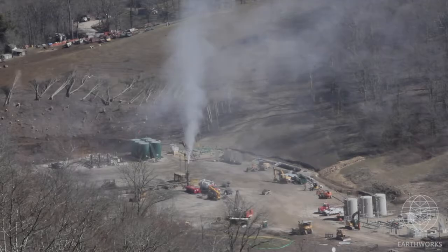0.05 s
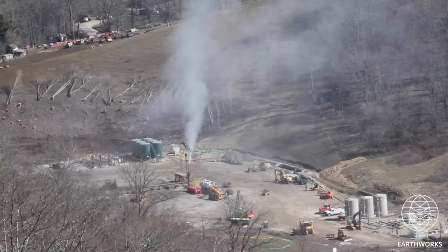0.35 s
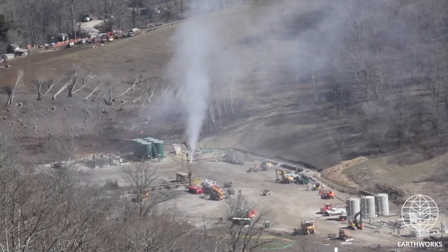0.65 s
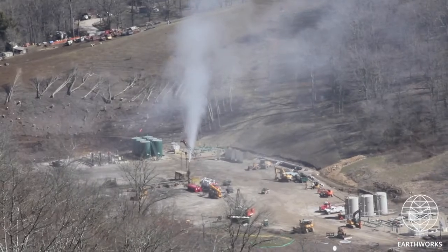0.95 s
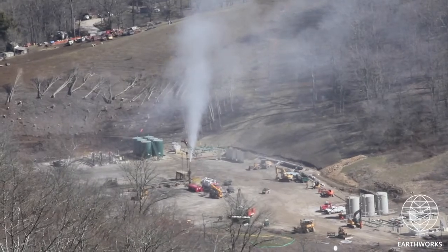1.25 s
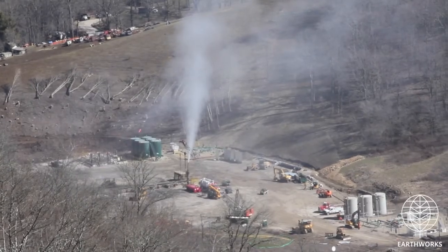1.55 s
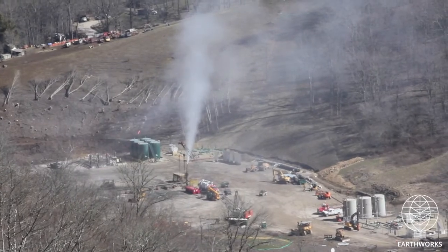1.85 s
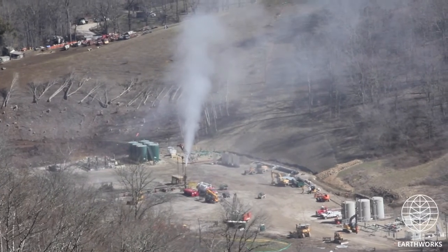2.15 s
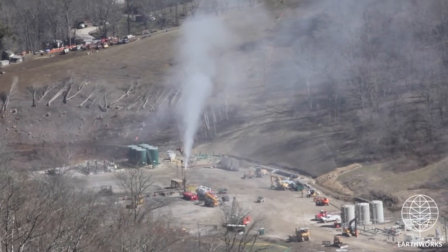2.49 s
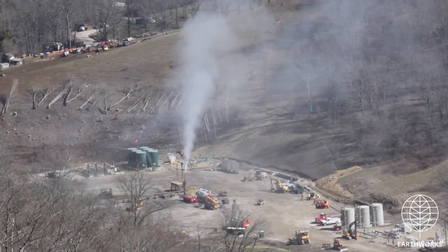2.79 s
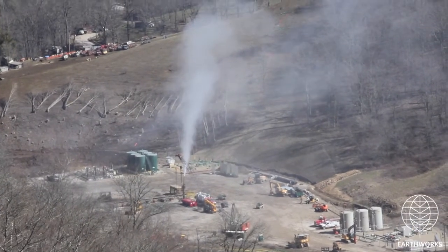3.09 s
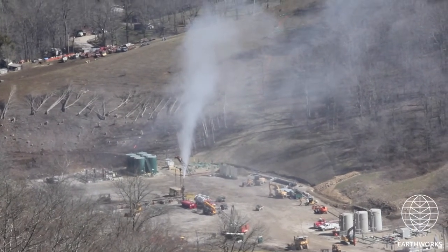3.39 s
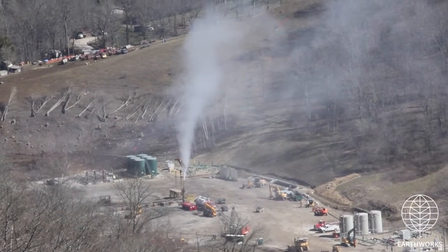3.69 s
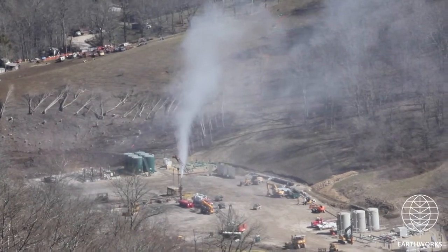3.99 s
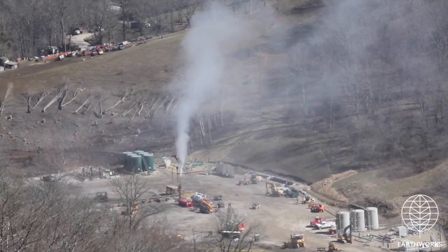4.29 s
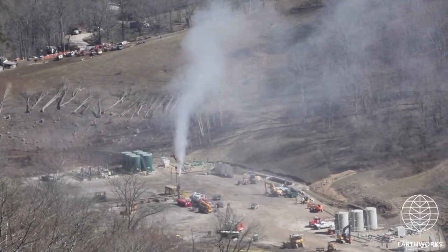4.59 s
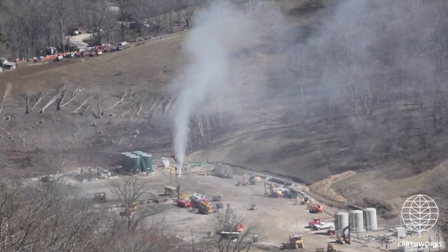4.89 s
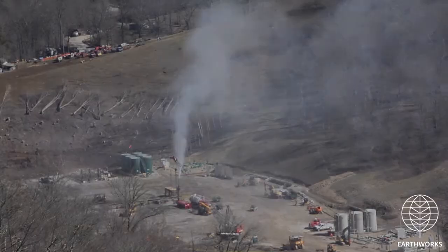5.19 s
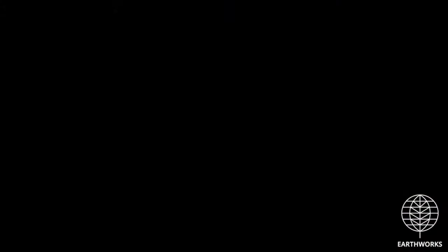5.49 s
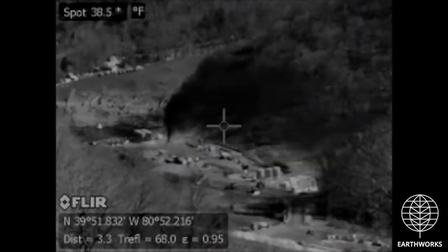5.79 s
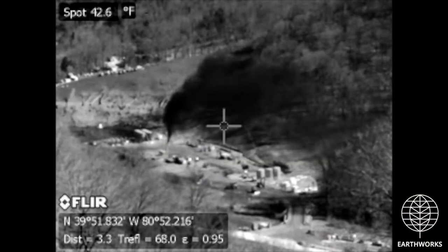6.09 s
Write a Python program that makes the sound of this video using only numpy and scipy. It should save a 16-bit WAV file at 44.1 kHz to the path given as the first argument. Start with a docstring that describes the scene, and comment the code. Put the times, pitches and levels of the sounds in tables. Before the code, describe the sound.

A blown-out gas well jets with a steady, dull roar, heard across a valley from a far hillside. Distance removes the treble, and moving air makes the roar swell and shift slightly. Close to the microphone are a thin hiss, a very faint camera motor whine and a few tiny ticks, with one small sharp click about midway. Everything fades smoothly to silence at the end.

```python
"""A steady, dull roar across a valley: a blown-out gas well, heard from a far hillside.
Distance takes the turbulent jet's treble; moving air swells its low, middle and upper bands in turn.
Close by: a light breeze on the microphone, thin hiss, the faint whine and flutter of the camera's
motors, one click of its case and a few tiny ticks. Then everything fades out."""
import sys
import numpy as np
from scipy import signal
from scipy.fft import rfft, irfft
from scipy.io import wavfile

SR = 44100
rng = np.random.default_rng(int(sys.argv[2]) if len(sys.argv) > 2 else 0)


def file_out(sig):
    """Save sig as 16-bit WAV at sys.argv[1]."""
    # one column per channel
    cols = np.atleast_2d(sig).T
    # limit, then scale
    lim = np.clip(cols, -1, 1)
    pcm = np.round(lim * 32767).astype(np.int16)
    wavfile.write(sys.argv[1], SR, pcm)


N = 275625
TIME = np.arange(N) / SR
ALL_HZ = np.fft.rfftfreq(N, 1 / SR)
BIN_HZ = np.fft.rfftfreq(1024, 1 / SR)
BAND_LIMIT_HZ = 15780
MOTOR_HZ = 24.49  # turns/s


def amp(db):
    """Decibels to gain."""
    return 10 ** (np.asarray(db) / 20)


def unit(x):
    """Scale to unit rms."""
    return x / np.sqrt(np.mean(x ** 2) + 1e-20)


def curve(rows, at_s):
    """Piecewise-linear control from (t/s, value) rows."""
    return np.interp(at_s, *np.transpose(rows))


def colour(points):
    """Spectral gains from (f/Hz, level/dB) rows, linear in dB over log frequency."""
    hz, db = np.transpose(points)
    return amp(np.interp(np.log(ALL_HZ + 1), np.log(hz), db))


def shaped(x, gains):
    """Filter by one gain per frequency; unit rms."""
    return unit(irfft(rfft(x) * gains, N))


def noise(gains):
    """Coloured Gaussian noise; unit rms."""
    return shaped(rng.standard_normal(N), gains)


def bell(offset, half_width):
    """Gaussian bump: height 1, down to 1/e at half_width."""
    return np.exp(-(offset / half_width) ** 2)


def wander(rate_hz):
    """Random drift up to about rate_hz; unit rms."""
    return noise(bell(ALL_HZ, rate_hz))


def tone(hz):
    """Sine following a frequency track."""
    return np.sin(2 * np.pi * np.cumsum(hz) / SR)


def crackle(rate_per_s=16, level_db=-82.5, highpass_hz=9000):
    """Very faint random ticks in the top treble."""
    impulses = (rng.random(N) < rate_per_s / SR) * rng.standard_normal(N)
    return amp(level_db) * shaped(impulses, 1 - np.exp(-(ALL_HZ / highpass_hz) ** 6))


def hiss(level_db=-55, start_offset_db=-5.5, settle_s=0.7):
    """Microphone self-noise; starts low and settles."""
    # hiss spectrum: f/Hz, relative level/dB
    spectrum = [(1000, 6), (4300, 3), (5200, 0), (7600, -1.5), (9200, -4), (10200, -5), (11000, -4.5),
                (12200, -6), (15700, -9)]
    return amp(level_db + start_offset_db * np.exp(-TIME / settle_s)) * noise(colour(spectrum))


def wind(breeze_db=-65, gust_db=-54.5, gust_s=4.25, half_width_s=0.25, corner_hz=55):
    """A light breeze rumbles on the microphone, with one soft gust."""
    strength = amp(breeze_db) + amp(gust_db) * bell(TIME - gust_s, half_width_s)
    return strength * noise(ALL_HZ / (1 + (ALL_HZ / corner_hz) ** 4))


def bearing(level_db=-64.5, centre_hz=8320, warble_hz=135, jitter_hz=105, jitter_rate_hz=650):
    """The motor's high whine, with a fast warble and a buzz from its cogs."""
    cogs, buzz_depth = 12, 0.4
    cog_phase = 2 * np.pi * cogs * MOTOR_HZ * TIME
    hz = centre_hz + warble_hz * np.sin(cog_phase / 2) + jitter_hz * wander(jitter_rate_hz)
    buzz = 1 + buzz_depth * np.cos(cog_phase)
    return amp(level_db) * unit(buzz * tone(hz))


def spurts(centre_hz=3990, waver_hz=22, waver_rate_hz=60):
    """The motor's whistle locks briefly into a nearly clean tone."""
    # tone bursts: t/s, half width/s, level/dB
    bursts = [(.18, .015, -60), (.28, .03, -61), (.857, .012, -53), (1.097, .022, -55), (1.415, .012, -54),
              (1.505, .016, -56), (2.132, .012, -54), (4.775, 0.028, -58), (5.195, 0.019, -55.5),
              (5.24, .02, -56), (5.33, .025, -57)]
    strength = sum(amp(db) * bell(TIME - s, half_width_s) for s, half_width_s, db in bursts)
    return strength * unit(tone(centre_hz + waver_hz * wander(waver_rate_hz)))


def motor(scrape_half_width_s=0.0013, flare_db=1.2, flare_hz=18):
    """A camera motor scrapes twice a turn; the case rings in narrow bands, the lowest a whistle."""
    # scrapes: position/turn, relative level/dB
    scrapes = [(0.01, -7.5), (0.54, -1)]
    # case resonances: f/Hz, width/Hz, level/dB, scrape modulation depth
    resonances = [(4003, 110, -61.5, 2.1), (4280, 270, -67.5, 1.6), (5290, 830, -75.5, 5),
                  (6140, 220, -71, 8.2), (7040, 240, -70.5, 1.5), (8700, 400, -72, 0.5)]
    # whistle swell: t/s, gain/dB
    whistle_gain = [(0, -7), (.7, -5.5), (1.3, -0.5), (1.7, 0.5), (2.15, -1.5), (3.5, 0.5), (4.2, -4.5),
                    (4.7, 1.5), (5, 0), (5.45, 0)]
    scraping = np.zeros(N)
    for position, db in scrapes:
        offset_turns = (TIME * MOTOR_HZ - position + 0.5) % 1 - 0.5
        scraping += amp(db) * bell(offset_turns / MOTOR_HZ, scrape_half_width_s)
    bands = []
    for hz, width_hz, db, depth in resonances:
        friction = rng.standard_normal(N) * (1 + depth * scraping)
        response = 1 / (1 + 1j * (ALL_HZ - hz) / width_hz * np.sqrt(2)) ** 2
        bands.append(amp(db) * shaped(friction, response))
    whistle, *fizz = bands
    whistle_db = curve(whistle_gain, TIME) + flare_db * wander(flare_hz)
    return whistle * amp(whistle_db) + spurts() + sum(fizz)


def lens(focus_mid_s=2.3, focus_length_s=0.9, idle_db=-7, drift_hz=2.5, drift_rate_hz=12):
    """The lens drive sings in thin tones, louder during one focus run."""
    # drive tones: f/Hz, rms level while focusing/dB
    partials = [(2832, -60), (3176, -60.5), (3960, -68), (4027, -68), (4985, -87), (6180, -69),
                (7031, -82.5), (7811, -77.5), (9184, -78.5)]
    whine = sum(amp(db) * tone(hz + drift_hz * wander(drift_rate_hz)) for hz, db in partials)
    focusing = np.exp(-(2 * (TIME - focus_mid_s) / focus_length_s) ** 4)
    return np.sqrt(2) * whine * amp(idle_db * (1 - focusing))


def ticks(crack_s=0.00055, tail_s=0.0015, tail_db=-14):
    """Tiny ticks: each a bright crack with a very short tail."""
    # ticks: t/s, peak level/dB, high-pass f/Hz
    events = [(0.3590, -47, 9000), (1.1604, -37, 10000), (1.8080, -37, 10000), (1.8392, -36, 9500),
              (2.1402, -40, 6000), (2.3343, -38, 6000), (3.4272, -44, 8000), (3.8009, -47, 10000),
              (4.0278, -45, 10000), (4.0777, -45, 10000), (4.9566, -45, 9000), (5.0140, -41, 7090),
              (5.3568, -34.5, 10000), (5.4507, -38, 10000), (5.7110, -38, 10000)]
    out = np.zeros(N)
    t = np.arange(1024) / SR
    envelope = t / crack_s * np.exp(1 - 2 * t / crack_s) + amp(tail_db) * np.exp(-t / tail_s)
    for s, db, highpass_hz in events:
        band = (1 - np.exp(-(BIN_HZ / highpass_hz) ** 6)) * (BIN_HZ < BAND_LIMIT_HZ)
        burst = envelope * rng.standard_normal(len(t))
        tick = irfft(rfft(burst) * band)
        out[round(s * SR):][:len(t)] += amp(db) * tick / abs(tick).max()
    return out


def click(onset_s=2.6991, rise_s=0.00022, crack_db=-24, crack_s=0.0012, highpass_hz=3000):
    """One fuller click: a short crack rings the camera's case."""
    # case modes: f/Hz, level/dB, decay/s
    modes = [(3330, -26, 0.0019), (3760, -25.5, .0014), (4700, -36, 0.0015), (6800, -28, 0.00089),
             (8600, -24, .0007)]
    t = np.maximum(TIME - onset_s, 0)
    ring = sum(amp(db) * np.exp(-t / decay_s) * np.sin(2 * np.pi * hz * t) for hz, db, decay_s in modes)
    crack = amp(crack_db) * np.exp(-t / crack_s) * noise(ALL_HZ > highpass_hz)
    return (1 - np.exp(-t / rise_s)) * (ring + crack)


def air_swells(frame_s):
    """Moving air swells five bands of the jet separately; dB per frame and bin."""
    # centres of deep bass, rumble, body, roar, rasp: f/Hz
    centres_hz = [105, 175, 330, 700, 1600]
    # slow swell of each band: t/s, gain/dB
    deep = [(0, -3.5), (2.5, -0.3), (3.3, -2), (3.9, 2), (5.4, 0)]
    rumble = [(0, 4), (0.5, 5.5), (2.2, 0.8), (3.4, 1.5), (3.7, -2.2), (4.2, -2.5), (4.6, 0), (5.0, 1),
              (5.4, 0)]
    body = [(0, -1.6), (1, -1.2), (1.8, -1.3), (3.8, -0.6), (4.2, 0.39), (5.1, 0.6), (5.4, 0.14)]
    roar = [(0, -4), (.7, -2.5), (1.15, 0), (1.4, -1), (2.2, -2.5), (2.7, -1.5), (3.4, -3), (4.4, -3.5),
            (5.25, 0.1), (5.5, -0.5)]
    rasp = [(0, -0.14), (0.4, 1.6), (.9, 1.3), (1.25, -0.67), (1.8, 1.2), (2.6, 0.22), (3.8, -0.61),
            (4.7, 0.17), (5.35, -1), (5.65, 1)]
    # brief surges and dips: t/s, half width/s, roar gain/dB, rasp gain/dB
    surges = [(.085, 0.032, 3.5, 1), (.32, 0.05, 0.5, 1), (.465, 0.024, 5.5, -0.5), (.675, 0.011, 3.5, 4),
              (.83, 0.025, 6, 1.5), (1.075, 0.024, 3, 1.5), (2.42, 0.17, 2, -1.5), (2.79, .04, 4, -0.5),
              (3.19, 0.043, -1.5, 1), (3.78, 0.055, 3, -1.5), (5.65, 0.014, -1, 5)]
    band_db = np.transpose([curve(band, frame_s) for band in (deep, rumble, body, roar, rasp)])
    for s, half_width_s, roar_db, rasp_db in surges:
        band_db[:, -2:] += np.outer(bell(frame_s - s, half_width_s), [roar_db, rasp_db])
    crossfades = [np.interp(np.log(BIN_HZ + 1), np.log(centres_hz), row) for row in np.eye(5)]
    return band_db @ np.array(crossfades)


def path_humps(frame_s, half_width_hz=95):
    """Three hollow humps in the roar drift with the sound path; dB per frame and bin."""
    # hump tracks: t/s, f/Hz, height/dB
    core = [(0, 666, 6.5), (.6, 660, 7), (1.2, 614, 3.5), (1.8, 623, 2), (2.4, 740, 2.5), (3.1, 690, 2),
            (4.1, 691, 3), (4.7, 700, 3), (5.25, 690, 3.5)]
    middle = [(.3, 1070, 0), (1.2, 1110, -0.5), (2.3, 1165, 4.5), (3, 1066, -1.5), (4.3, 1130, 2),
              (5.399, 1060, 1.5)]
    rasp = [(.3, 1535, 5), (1.1, 1800, 3), (1.7, 1533, 5), (2.2, 1670, 4), (3.3, 1574, -2.5),
            (4.1, 1500, 0), (4.9, 1650, -1.5), (5.6, 1633, 5.5)]
    gain_db = 0
    for track in (core, middle, rasp):
        s, hz, db = np.transpose(track)
        centre_hz = np.interp(frame_s, s, hz)[:, None]
        height_db = np.interp(frame_s, s, db)[:, None]
        gain_db += height_db * bell(BIN_HZ - centre_hz, half_width_hz)
    return gain_db


def path_patches(frame_s, rms_db=1.01, blur_s=0.066, blur_hz=150):
    """Paths through moving air add and cancel in random patches; dB per frame and bin."""
    offset_s = frame_s[:, None] - frame_s[-1] / 2
    offset_hz = BIN_HZ - BIN_HZ[-1] / 2
    blur = bell(offset_s, blur_s) * bell(offset_hz, blur_hz)
    return rms_db * unit(signal.fftconvolve(rng.standard_normal(blur.shape), blur, "same"))


def jet(level_db=-15.5, flutter_db=0.06, flutter_hz=25):
    """Turbulent mixing noise of the gas jet, modulated by moving air and dulled by distance."""
    # mean spectrum at the hillside, lower and upper part: f/Hz, relative level/dB
    lows = [(20, -40), (48, -37.5), (63, -20.5), (78, -18.5), (118, -7.5), (145, -8), (178, -5), (225, -8),
            (275, -10.5), (370, -7), (455, -7.5), (520, -1.5)]
    highs = [(590, -3.5), (665, -1), (820, -0.36), (950, -4), (1130, -6), (1350, -12), (1570, -11.7),
             (1840, -15.5), (1960, -19.5), (2240, -28), (2400, -26.5), (3000, -41.5), (3700, -52.5),
             (5000, -67), (9000, -92)]
    hop = 256
    frame_s = np.arange(N // hop + 5) * hop / SR
    real, imag = rng.standard_normal((2, len(frame_s), len(BIN_HZ)))
    air_db = air_swells(frame_s) + path_humps(frame_s) + path_patches(frame_s)
    spectra = (real + 1j * imag) * amp(air_db)
    flow = signal.istft(spectra.T, nperseg=1024, noverlap=1024 - hop)[1][:N]
    flow *= amp(-flutter_db * wander(flutter_hz))  # large eddies shake all bands together
    return amp(level_db) * shaped(flow, colour(lows + highs))


def scene():
    """The far jet plus the small sounds at the camera; mono."""
    return (jet() + wind() + hiss() + lens() + motor() + bearing() + ticks() + click() + crackle())[None]


def record(dry):
    """Quick fade-in, half-cosine fade-out, band limit."""
    fade_in_s, fade_start_s, fade_end_s = 0.00077, 5.178, 6.013
    opening = np.minimum(TIME / fade_in_s, 1)
    closing = np.clip((TIME - fade_start_s) / (fade_end_s - fade_start_s), 0, 1)
    fade = opening * (1 + np.cos(np.pi * closing)) / 2
    low_pass = signal.firwin(1023, BAND_LIMIT_HZ, window=("kaiser", 9), fs=SR)
    return signal.oaconvolve(dry * fade, low_pass[None], "same")


dry = scene()
out = record(dry)
file_out(out)
```